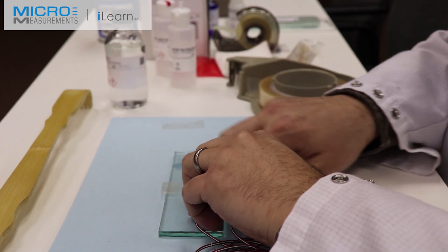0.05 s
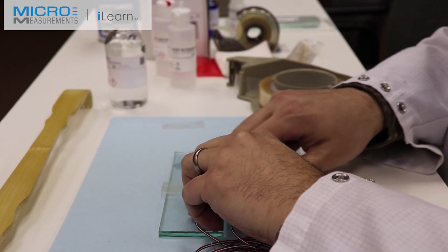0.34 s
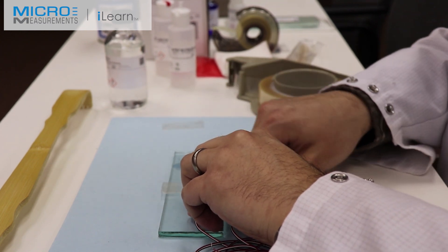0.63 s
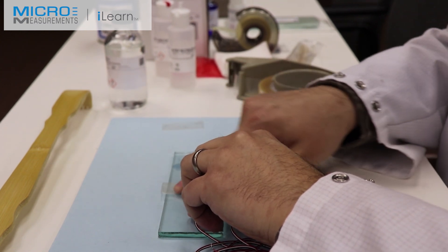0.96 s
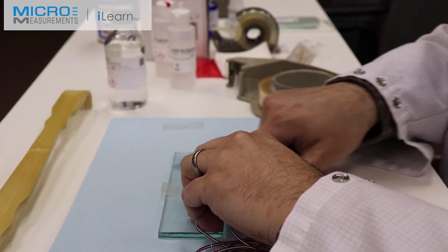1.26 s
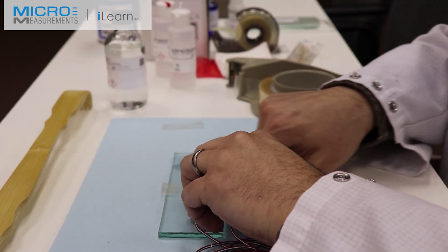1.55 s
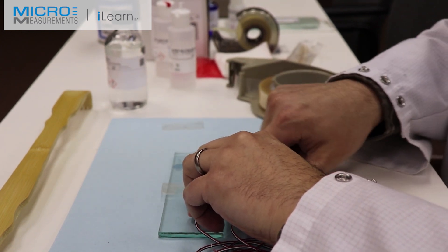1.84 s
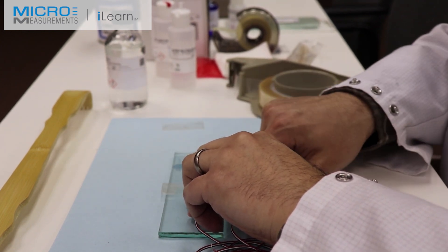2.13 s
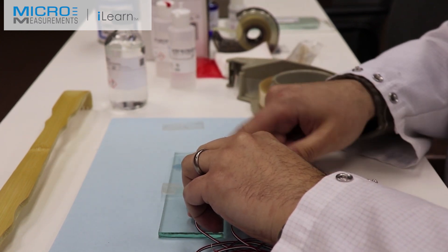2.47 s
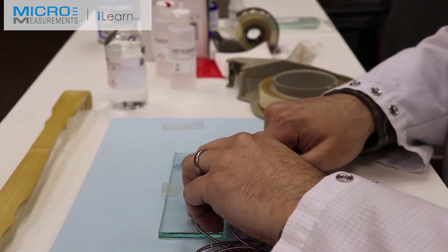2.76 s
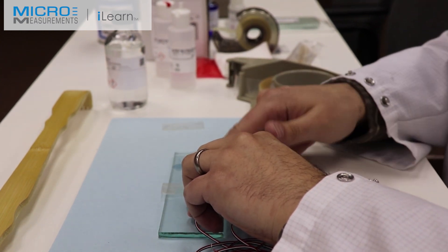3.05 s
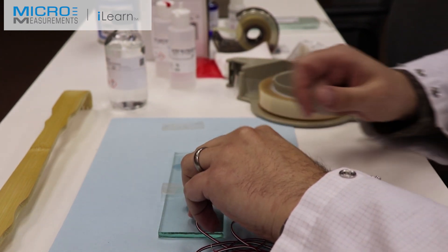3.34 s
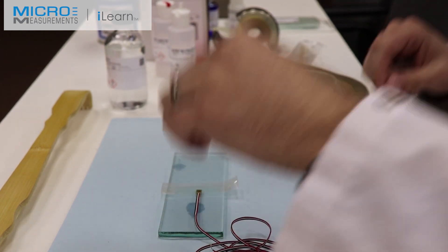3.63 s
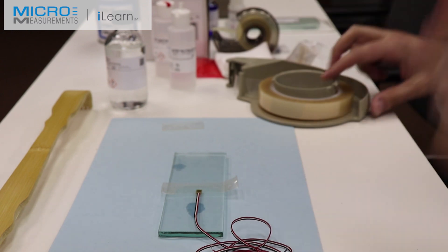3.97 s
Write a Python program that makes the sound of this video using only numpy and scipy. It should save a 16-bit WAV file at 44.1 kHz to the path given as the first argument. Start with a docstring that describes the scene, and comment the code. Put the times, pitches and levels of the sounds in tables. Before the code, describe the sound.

Adhesive tape is peeled from a glass plate over steady room ventilation. A soft table bump and tick come first, then a faint finger rub that squeaks near 1.7 seconds. A knock rings the glass at 2.5. From 2.8 the tape crackles with sharp snaps, drags roughly and flicks free with a thud at 3.3. Sleeves rustle, and hands knock lightly on the table near 4 seconds.

```python
"""A soft table bump and a tick over steady ventilation, then adhesive tape worked on a glass plate. A finger
rubs the tape; stick-slip makes the glass sing. A knock rings the plate. The tape peels: glue threads crackle,
patches snap off, the loudest with a brief overload crack. A finger drags hard over the ringing glass, and the
tape flicks free with a thud into the table. Hands knock and sleeves rustle in a quiet room with a short
reverberation."""
import sys
import numpy as np
from scipy import signal
from scipy.fft import rfft, irfft
from scipy.io import wavfile
from scipy.ndimage import uniform_filter1d

SR = 44100
rng = np.random.default_rng(int(sys.argv[2]) if len(sys.argv) > 2 else 0)


def wrap_up_sound(samples):
    """Save the sound to the file named by the first command line argument, as 16-bit audio."""
    columns = np.atleast_2d(samples).T
    # keep every value between -1 and 1, then stretch to whole-number steps
    tamed = np.clip(columns, -1, 1)
    steps = np.round(tamed * 32767).astype(np.int16)
    wavfile.write(sys.argv[1], SR, steps)


N = 176400

# ventilation air spectrum: freq_hz, gain_db
AIR_SPECTRUM = [(12, -31), (20, -6), (65, -4), (86, -5.5), (101, -6.5), (120, -2.5), (158, -8), (204, -4.5),
                (241, -5.5), (328, -5), (367, -8), (472, -14.5), (590, -15), (802, -16.5), (873, -16.5),
                (1150, -24.5), (1330, -25), (1440, -25.5), (2670, -34.5), (14700, -45.5), (16000, -44)]
# ventilation hum: pitch_hz, level_db
HUM_TONES = [(119, -52.5), (358, -47.5), (856, -59)]

# sleeve rustle envelope: time_s, level_db
SLEEVE_ENVELOPE = [(0, -48), (.2, -62), (.4, -76), (3.2, -62), (3.32, -44), (3.45, -51), (3.68, -54),
                   (3.85, -47.5), (4, -47)]
# sleeve rustle spectrum: freq_hz, gain_db
SLEEVE_SPECTRUM = [(400, -8), (1000, 2), (2500, -4), (4200, -4), (6000, -14), (8200, -8), (16000, -19)]
# light hand knocks: start_s, level_db
HAND_KNOCKS = [(2.7615, -35), (3.8452, -23), (3.873, -30.5), (3.9495, -31), (3.962, -37), (3.986, -31.5)]
# hand knock spectrum: freq_hz, gain_db
KNOCK_SPECTRUM = [(150, -18), (450, -11), (680, 5), (900, -2), (1350, -2), (2000, -15.5), (3200, -24),
                  (4500, -34), (16000, -49)]
# soft table bumps: start_s, level_db, ring_gain_db
TABLE_BUMPS = [(.002, -30, -25.5), (2.5447, -19, -34), (3.991, -17, -39)]
# bump spectrum: freq_hz, gain_db
BUMP_SPECTRUM = [(50, -17), (130, -6.5), (240, 2), (330, -1), (500, -18.5), (1000, -31), (4000, -56),
                 (16000, -80)]
# table modes: pitch_hz, gain_db, t60_s
TABLE_MODES = [(196, -5, 0.14), (249.6, 3, .19), (241.5, -12, 1), (317, -6, 0.15), (388, -14, .25),
               (464, -3, 0.24), (574, -5, 0.18), (655, -5, 0.3), (745, -4.5, 0.21), (864, -10.5, 0.16),
               (1045, -8.5, 0.15), (1177, -8.5, 0.11), (1492, -1.5, 0.072)]
# tape and nail ticks: start_s, peak_db, centre_hz, width_hz
SMALL_TICKS = [(.106, -30, 11000, 16000), (1.169, -42.5, 4000, 1600), (1.191, -36.5, 4300, 2000),
               (1.213, -43, 8500, 4000), (2.452, -35, 7500, 5000), (2.762, -34, 4000, 8000),
               (3.97, -32.5, 4360, 600)]

# glass plate modes: pitch_hz, gain_db, t60_s
GLASS_MODES = [(194, -5, 0.15), (241, -7.5, 0.18), (1034, -8, 0.064), (1350, -1, 0.12), (2422, -18.5, 0.21),
               (3730, -13, 0.1), (5080, -23, .08), (7190, -10.5, 0.05), (8200, -16, 0.056),
               (11700, -26, 0.05), (12650, -24, 0.055)]
# spectrum of the knock on the glass: freq_hz, gain_db
TAP_SPECTRUM = [(100, -28), (280, -3), (550, -4), (800, -2), (1100, 3), (1400, -3), (1750, -12.5),
                (2400, -9), (2800, -5.5), (4200, -7), (4800, -25), (6400, -23), (7300, -21), (16000, -35)]
# spectrum of the final flick: freq_hz, gain_db
FLICK_SPECTRUM = [(100, -22), (300, -7), (700, 1), (1150, -3.5), (1600, -8.5), (2600, -17.5), (3700, -13.5),
                  (5100, -27), (5600, -34), (7300, -23.5), (7900, -35), (16000, -47)]

# finger rub envelope: time_s, level_db
RUB_ENVELOPE = [(1.24, -68), (1.31, -48), (1.35, -62), (1.48, -60.5), (1.6, -53.5), (1.675, -65),
                (1.705, -38), (1.745, -43.5), (1.77, -51), (1.79, -75)]
# finger rub spectrum: freq_hz, gain_db
RUB_SPECTRUM = [(500, -15), (1500, -2), (2800, 3.5), (4500, -3), (6000, -12), (9000, -10), (12000, -10.5),
                (16000, -17)]
# singing glass envelope: time_s, gain_db
SING_ENVELOPE = [(1.47, -77), (1.6, -60), (1.67, -60), (1.71, -44), (1.76, -47.5), (1.81, -74)]
# rubbed glass resonances: centre_hz, width_hz, gain_db
SING_RESONANCES = [(3750, 70, 0), (5070, 80, -12), (7200, 100, -7.5), (8170, 160, -13)]
# finger drag envelope: time_s, level_db
DRAG_ENVELOPE = [(3.15, -61), (3.16, -28), (3.185, -25), (3.206, -26.5), (3.228, -19), (3.245, -22),
                 (3.264, -23), (3.274, -68)]
# finger drag spectrum: freq_hz, gain_db
DRAG_SPECTRUM = [(100, -27), (240, -7), (380, -9), (490, -16), (620, -4.5), (870, -14), (1150, -11.5),
                 (1600, -14.5), (2600, -18.5), (3800, -21.5), (5000, -25), (5900, -34), (8500, -37),
                 (12000, -39), (16000, -45)]
# glass resonances under the drag: centre_hz, width_hz, boost_db
DRAG_RESONANCES = [(242.4, 16, 14.5), (654, 130, 6), (1053, 63, 6.5), (1180, 45, 10.5), (1465, 28, 15.5),
                   (2010, 110, 10), (3210, 120, 13.5), (3770, 240, 13), (5130, 90, 11), (7230, 140, 16.5),
                   (8180, 190, 17.5)]

# peel envelope: time_s, level_db
PEEL_ENVELOPE = [(2.775, -57), (2.792, -35), (2.803, -32.5), (2.818, -29.5), (2.836, -32), (2.852, -31),
                 (2.868, -64), (2.888, -37), (2.926, -33.5), (2.964, -34.5), (3.02, -32.5), (3.12, -31.5),
                 (3.146, -34), (3.2, -35.5), (3.262, -34), (3.275, -73)]
# peel spectrum: freq_hz, gain_db
PEEL_SPECTRUM = [(250, -11), (700, -11), (900, -4), (1500, -3.5), (2000, -4), (2700, -4), (4500, -8.5),
                 (5400, -14), (6000, -22), (7000, -19), (8500, -24), (9300, -30), (16000, -40)]
# taut strip resonances: centre_hz, width_hz, boost_db
STRIP_RESONANCES = [(822, 52, 10.5), (1154, 180, 6.5), (1596, 135, 8), (2096, 280, 2.5), (3665, 170, 9.5),
                    (4443, 174, 10.5), (5360, 230, 10.5), (6380, 140, 8), (7550, 260, 12), (8400, 240, 9.5)]
# sudden glue slips: start_s, level_db, t60_s
GLUE_SNAPS = [(2.7916, -35, .014), (2.811, -28, 0.011), (2.8212, -17, 0.026), (2.8242, -18, 0.016),
              (2.8312, -18.5, 0.029), (2.8432, -10, 0.015), (2.876, -28.5, 0.019), (2.909, -36, .008),
              (3, -34, .008), (3.0235, -36, 0.0097), (3.054, -34, .008), (3.1123, -32, 0.0097)]
# snap spectrum: freq_hz, gain_db
SNAP_SPECTRUM = [(300, -17), (1100, -12.5), (1650, -2), (2000, 3), (2800, -4), (3300, 1.5), (4400, 2),
                 (5400, -4), (6000, -18), (7000, -31), (8400, -31), (9300, -48), (16000, -54)]
# brief overload crack as the loudest snap clips: freq_hz, gain_db
OVERLOAD_SPECTRUM = [(3000, -8), (6300, 2), (7100, -3), (9000, 1), (13000, 3), (16000, -19)]


def amp(db):
    """Decibels to gain."""
    return 10 ** (np.asarray(db) / 20)


def unit(x):
    """Scale to rms 1."""
    return x / np.sqrt(np.mean(x ** 2))


def clock():
    """Sample times in seconds."""
    return np.arange(N) / SR


def fader(envelope):
    """Gain along (time_s, level_db) points, silent outside them."""
    time_s, level_db = np.array(envelope).T
    return amp(np.interp(clock(), time_s, level_db, left=-200, right=-200))


def decay(t, t60_s):
    """Exponential decay, 60 dB down at t60_s."""
    return np.exp(-np.log(1000) * t / t60_s)


def add(out, start_s, x):
    """Mix x in at start_s."""
    i = int(start_s * SR)
    out[i:i + len(x)] += x[:N - i]


def band(x, centre_hz, width_hz):
    """One resonance."""
    return signal.lfilter(*signal.iirpeak(centre_hz, centre_hz / width_hz, fs=SR), x)


def lowpass(x, cutoff_hz):
    """Second-order low-pass."""
    return signal.sosfilt(signal.butter(2, cutoff_hz, fs=SR, output="sos"), x)


def colour(x, spectrum, resonances=(), size=8192):
    """Minimum-phase filter: a broad spectrum with resonances on top."""
    freq_hz, gain_db = np.array(spectrum).T
    bin_hz = np.maximum(np.arange(size // 2 + 1) * SR / size, 1)
    gain = amp(np.interp(np.log(bin_hz), np.log(freq_hz), gain_db))
    gain *= np.minimum(bin_hz / freq_hz[0], 1)
    peak_power = sum(amp(boost_db) ** 2 / (1 + (2 * (bin_hz - centre_hz) / width_hz) ** 2) ** 2
                     for centre_hz, width_hz, boost_db in resonances)
    gain *= np.sqrt(1 + peak_power)
    cepstrum = irfft(np.log(gain))
    cepstrum[1:size // 2] *= 2  # fold onto positive time
    cepstrum[size // 2 + 1:] = 0
    impulse = irfft(np.exp(rfft(cepstrum)))
    return signal.oaconvolve(x, impulse)[:len(x)]


def impact(spectrum, level_db, tail_db, t60_s, resonances=(), size=4096):
    """Filtered click with a scattered tail; level_db is the rms of the first 5 ms."""
    x = amp(tail_db) * rng.standard_normal(size) * decay(np.arange(size) / SR, t60_s)
    x[0] = 1
    x = colour(x, spectrum, resonances, size)
    return amp(level_db) * x / np.std(x[:SR // 200])


def ring(modes):
    """Struck object: damped sines of alternating sign."""
    t = clock()[:SR]
    return sum((-1) ** k * amp(gain_db) * np.sin(2 * np.pi * pitch_hz * t) * decay(t, t60_s)
               for k, (pitch_hz, gain_db, t60_s) in enumerate(modes))


def crackle(spectrum, envelope, rate_per_s, spread_db, resonances=()):
    """Random tiny ruptures, many weak and a few strong, filtered and enveloped."""
    sizes = amp(spread_db * np.minimum(rng.exponential(size=N), 4))
    pulses = (rng.random(N) < rate_per_s / SR) * sizes * rng.choice([-1, 1], N)
    return unit(colour(pulses, spectrum, resonances)) * fader(envelope)


def ventilation(air_db=-38.5):
    """Steady rush of air with a faint wavering hum."""
    out = amp(air_db) * unit(colour(rng.standard_normal(N), AIR_SPECTRUM))
    for pitch_hz, level_db in HUM_TONES:
        out += amp(level_db) * unit(band(rng.standard_normal(N), pitch_hz, width_hz=7.7))
    return out


def room(x, gain_db=-7.5, bass_t60_s=.4, treble_t60_s=.26, treble_db=-14, delay_s=.008):
    """Short diffuse reverberation, weaker and briefer in the treble."""
    t = clock()[:SR // 2]
    scatter = rng.standard_normal(len(t)) * (t > delay_s)
    bass = lowpass(scatter, cutoff_hz=1000)
    bass_decay = decay(t, bass_t60_s)
    tail = bass * bass_decay + amp(treble_db) * (scatter - bass) * decay(t, treble_t60_s)
    return amp(gain_db) * signal.fftconvolve(x, tail / np.linalg.norm(bass_decay))[:N]


def hands():
    """Sleeves rustle, hands knock and bump the table, tape and nails tick."""
    out = crackle(SLEEVE_SPECTRUM, SLEEVE_ENVELOPE, rate_per_s=5000, spread_db=3.5)
    for start_s, level_db in HAND_KNOCKS:
        add(out, start_s, impact(KNOCK_SPECTRUM, level_db, tail_db=-19, t60_s=.035))
    boom = lowpass(ring(TABLE_MODES), cutoff_hz=302)  # flesh barely rings the upper modes
    for start_s, level_db, ring_gain_db in TABLE_BUMPS:
        add(out, start_s, impact(BUMP_SPECTRUM, level_db, tail_db=-33, t60_s=.058))
        add(out, start_s, amp(ring_gain_db) * boom)
    t = clock()[:SR // 10]
    for start_s, peak_db, centre_hz, width_hz in SMALL_TICKS:
        burst = rng.standard_normal(len(t)) * decay(t, t60_s=.018)
        tick = band(band(burst, centre_hz, width_hz), centre_hz, width_hz)
        add(out, start_s, amp(peak_db) * tick / np.abs(tick).max())
    return out


def plate(tap_s=2.5511, glass_gain_db=-14.5, flick_s=3.2672, table_gain_db=-20.5):
    """A knock rings the glass; the final flick thuds through it into the table."""
    out = np.zeros(N)
    add(out, tap_s, impact(TAP_SPECTRUM, level_db=-13.5, tail_db=-27.5, t60_s=.036))
    add(out, tap_s, amp(glass_gain_db) * ring(GLASS_MODES))
    add(out, flick_s, impact(FLICK_SPECTRUM, level_db=-10, tail_db=-12, t60_s=.035))
    add(out, flick_s, amp(table_gain_db) * ring(TABLE_MODES))
    return out


def friction():
    """Dense stick-slip on the glass: a light rub makes it sing, later a finger drags hard over it."""
    rub = crackle(RUB_SPECTRUM, RUB_ENVELOPE, rate_per_s=6000, spread_db=1.5)
    grip = rng.standard_normal(N)
    sing = sum(amp(gain_db) * unit(band(band(grip, centre_hz, width_hz), centre_hz, width_hz))
               for centre_hz, width_hz, gain_db in SING_RESONANCES)
    drag = crackle(DRAG_SPECTRUM, DRAG_ENVELOPE, rate_per_s=5000, spread_db=2,
                   resonances=DRAG_RESONANCES)
    return rub + sing * fader(SING_ENVELOPE) + drag


def peel(overload_s=2.8435):
    """Glue threads break and shake the strip; patches snap off, the loudest with an overload crack."""
    out = crackle(PEEL_SPECTRUM, PEEL_ENVELOPE, rate_per_s=5400, spread_db=4.5,
                  resonances=STRIP_RESONANCES)
    for start_s, level_db, t60_s in GLUE_SNAPS:
        snap = impact(SNAP_SPECTRUM, level_db, tail_db=-14, t60_s=t60_s, resonances=STRIP_RESONANCES)
        add(out, start_s, snap)
    add(out, overload_s, impact(OVERLOAD_SPECTRUM, level_db=-29, tail_db=-28, t60_s=.006))
    return out


def scene():
    """Mono mix: handling, its reverberation, ventilation."""
    handling = peel() + friction() + plate() + hands()
    return (handling + room(handling) + ventilation())[None]


def record(dry):
    """Full-scale clip, then a steep low-pass."""
    cutoff_hz = 15800
    top_cut = signal.ellip(10, .2, 80, cutoff_hz, fs=SR, output="sos")
    return signal.sosfilt(top_cut, np.clip(dry, -1, 1))


dry = scene()
out = record(dry)
wrap_up_sound(out)
```